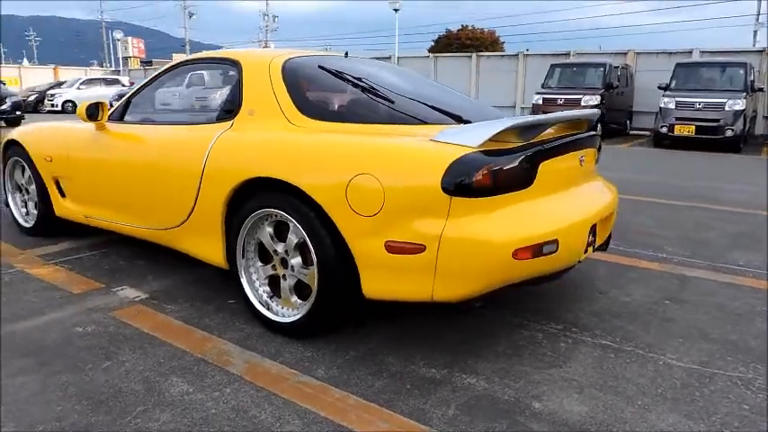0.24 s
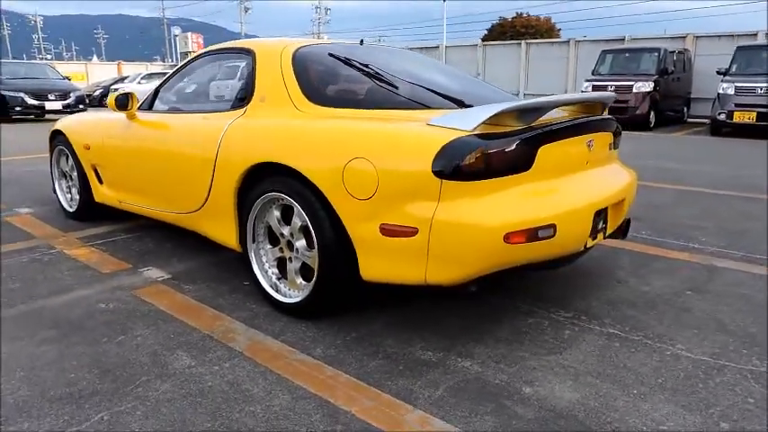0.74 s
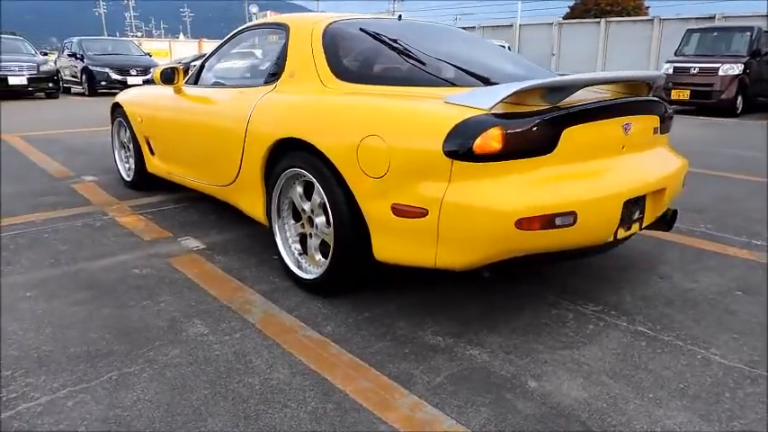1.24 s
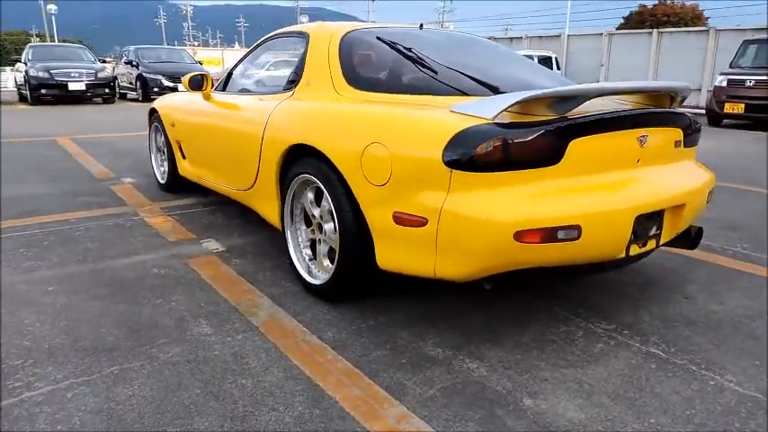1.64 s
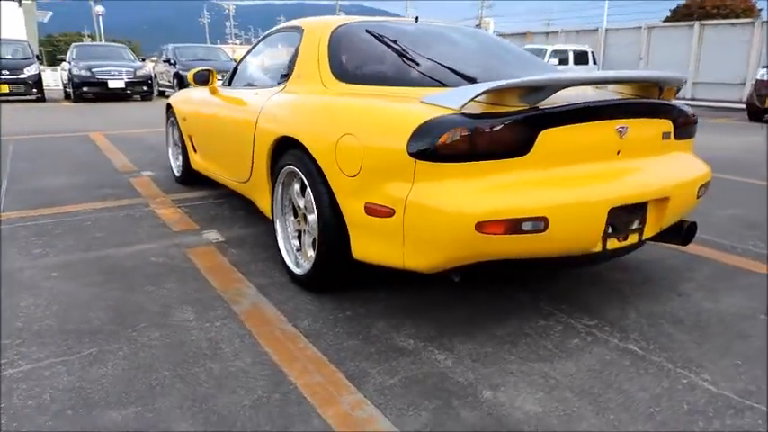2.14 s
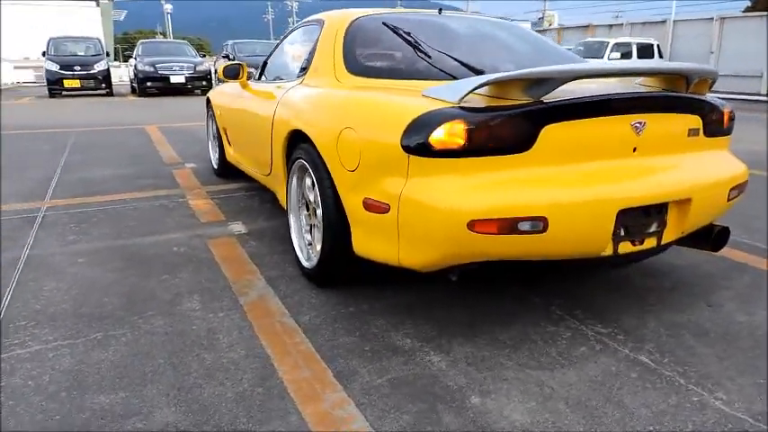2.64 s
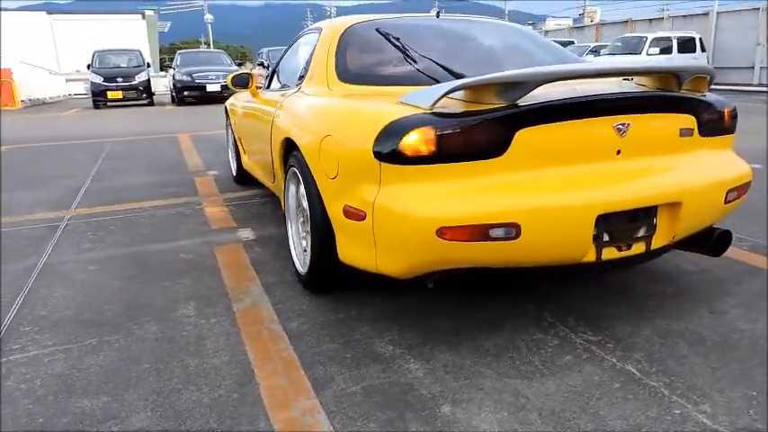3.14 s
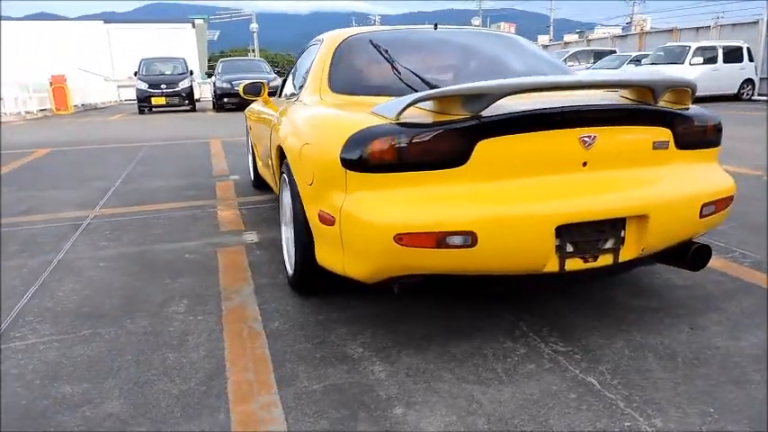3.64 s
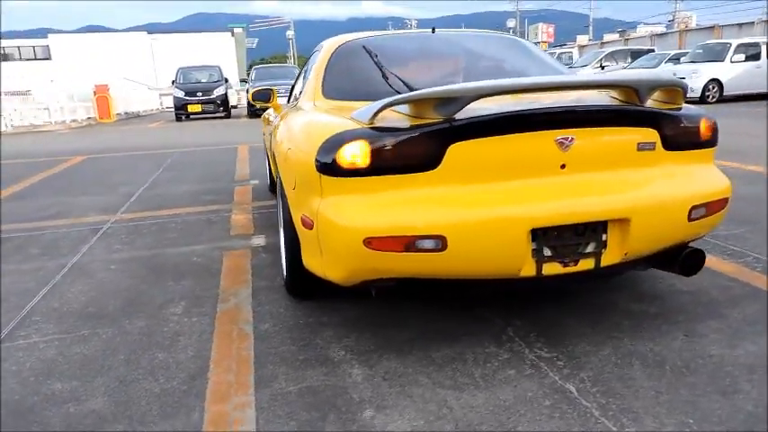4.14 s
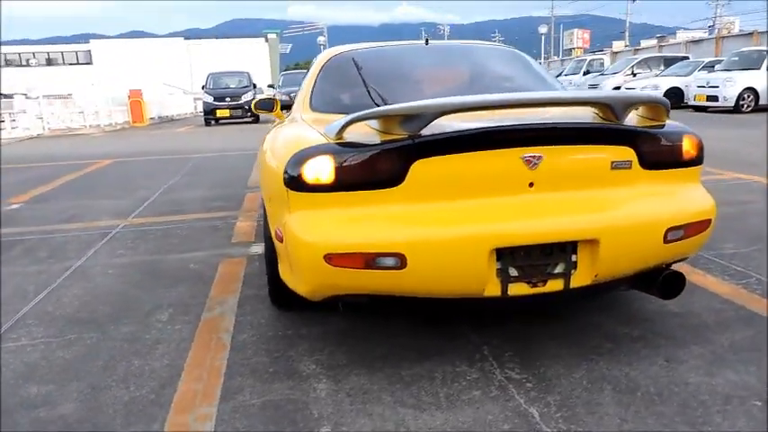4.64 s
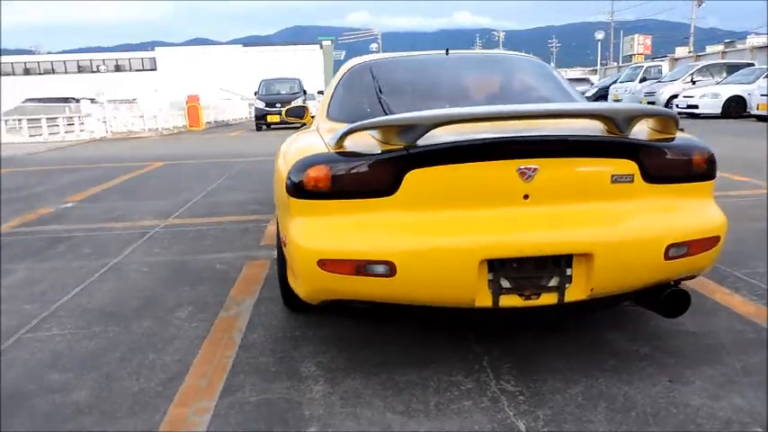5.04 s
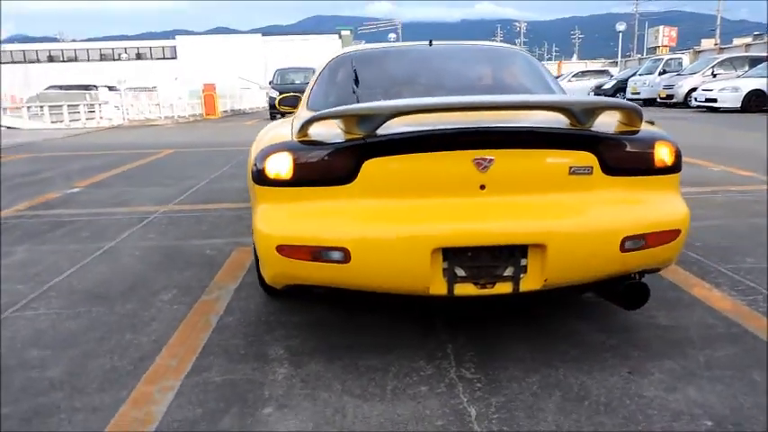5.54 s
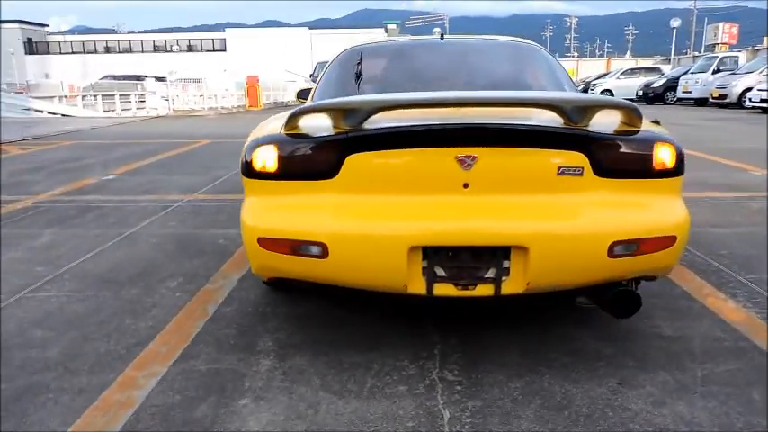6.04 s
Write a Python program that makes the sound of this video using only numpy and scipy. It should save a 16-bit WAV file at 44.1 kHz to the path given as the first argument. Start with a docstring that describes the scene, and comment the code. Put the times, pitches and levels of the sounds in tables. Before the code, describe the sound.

The deep, pulsing exhaust drone of an idling sports car swells and sinks, buffeted by dull bumps of wind.

```python
"""A car idles with a fast, low throb while gusts of wind thump on the microphone.
Its rotary engine fires about twenty times a second. Each push of gas rings the silencer and tail pipe
and comes with a puff of noise, a rattle and a hiss. The drone changes as the listener walks round to the
tail. Gusts hit the left and right sides separately; the scene sinks after strong ones and swells again.
Behind it all are a thin sizzle, one faint squeak, a few clicks and a soft breeze."""
import sys
import numpy as np
from scipy.fft import rfft, irfft, next_fast_len
from scipy.io import wavfile
from scipy.ndimage import uniform_filter1d, map_coordinates

SR = 44100
rng = np.random.default_rng(int(sys.argv[2]) if len(sys.argv) > 2 else 0)


def to_wav(sig):
    """Store sig (one row per channel, or 1-D mono) as 16-bit WAV at the path in sys.argv[1].

    Samples outside -1..1 are clipped; the rate is SR.
    """
    pcm = np.clip(np.atleast_2d(sig), -1, 1) * 32767
    pcm = np.round(pcm).astype(np.int16)
    wavfile.write(sys.argv[1], SR, pcm.T)  # frames by channels


N = 277808

# The scene's loudness, set to sink after strong gusts and recover: time_s, scene_db, boom_db
LOUDNESS = [(0.05, -65, -21), (0.33, -67, -22), (0.5, -68, -19), (0.53, -73.5, -29), (0.79, -78, -32.5),
            (1.05, -78, -33), (1.48, -71.5, -23.5), (1.85, -75, -29), (2.26, -68, -20.5),
            (2.45, -75.5, -28), (3.05, -74, -25), (3.52, -67.5, -19), (3.8, -69, -19.5), (3.97, -79, -29),
            (4.49, -80, -32), (4.9, -73, -21), (5.27, -80.5, -30.5), (5.82, -70.5, -18.5),
            (5.99, -78.5, -25.5), (6.25, -76.5, -26.5)]


def engine():
    """The idling car: all its sounds follow the same firings and are louder on the right."""
    # As the listener walks round the car, the left side hears it early or late: time_s, delay_samples
    left_delay = [(0, -2), (.6, -4), (2.7, -1), (4.7, 2), (6.3, 2)]
    scene_db, boom_db = curves(LOUDNESS)
    phase, firing, strength = firings()
    boom = exhaust_boom(firing, strength) * amp(boom_db + lean_right(2.5))
    roar = gas_roar(phase, firing, strength) * amp(scene_db + 37)
    drone = gas_drone(phase, firing, strength) * amp(scene_db + 22.5)
    tick_strength = rng.standard_normal(len(strength))
    accent = amp(1.8 * tick_strength[firing] + 2.5 * (-1) ** firing)  # every second firing is harder
    rattling = rattle(phase) * accent * amp(scene_db)
    spitting = spit(phase) * accent * amp(scene_db - 0.5)
    hiss = engine_hiss(phase, firing, tick_strength) * amp(scene_db + 8 + lean_right(1.2))
    left, right = boom + hiss + (roar + drone + rattling + spitting) * amp(lean_right(2.3))
    left = map_coordinates(left, [np.arange(N) - curves(left_delay)[0]], mode="nearest")
    return np.array([left, right])


def firings():
    """The beat: how far each cycle has got (0 to 1), which firing it is, and a random strength for each."""
    # The slightly uneven idle: time_s, firings_per_s
    idle_speed = [(0.0, 20.308), (0.45, 19.986), (0.9, 19.856), (1.35, 19.843), (1.8, 19.995),
                  (2.25, 19.966), (2.7, 20.222), (3.15, 19.963), (3.6, 19.658), (4.05, 19.856),
                  (4.5, 19.799), (4.95, 20.282), (5.4, 19.933), (5.85, 19.911), (6.3, 20.283)]
    cycles = np.cumsum(curves(idle_speed)[0]) / SR + .1
    firing = cycles.astype(int)
    return cycles % 1, firing, rng.standard_normal(firing[-1] + 1)


def exhaust_boom(firing, strength):
    """Each firing is one rounded push of gas that rings the silencer and the tail pipe."""
    # The silencer's notes, which swell after the push: pitch_hz, width_hz, level_db
    silencer_notes = [(37.9, 11, -6.5), (60.25, 6.9, 2), (79.7, 6.6, -4.5)]
    # The tail pipe's notes, which start at once: pitch_hz, width_hz, level_db
    pipe_notes = [(114.07, 11.6, -3.5), (132, 17, -18.5), (177.5, 18, -23.5), (243.5, 17, -15)]
    size = amp(1.3 * strength[firing] + 0.2 * (-1) ** firing)  # the two rotors differ a little
    pushes = np.diff(firing, prepend=0) * size
    ring = lambda f, hz, width, db: amp(db) * width / (hz * hz - f * f + 1j * f * width)
    silencer = lambda f: sum((note[0] + .3j * f) * ring(f, *note) for note in silencer_notes)
    pipe = lambda f: sum(1j * f * ring(f, *note) for note in pipe_notes)
    travel_s = .0038  # from the engine to the pipe's mouth
    round_push = lambda f: np.exp(-2j * np.pi * f * travel_s) / (1 + (f / 220) ** 3)
    return unit(filtered(pushes, lambda f: (silencer(f) + pipe(f)) * round_push(f)))


def gas_roar(phase, firing, strength):
    """Deep noise of gas and engine that puffs at each firing."""
    # The roar's tone: pitch_hz, level_db
    tone = [(30, 2), (100, 2.5), (200, -7), (400, -14), (620, -15.5), (800, -18.5), (1500, -24),
            (2000, -29.5), (2800, -37), (4100, -58.5), (6000, -64)]
    return unit(stereo_noise(tone) * puffs(phase, firing, strength, puff_db=0, rotor_db=-0.5, life=0.2))


def gas_drone(phase, firing, strength):
    """Gas noise hums in a few bands, whose balance shifts on the walk from the car's side to its tail."""
    # The humming bands: pitch_hz, width_hz, beside_car_db, behind_car_db
    hums = [(245, 26, 2, 0), (375, 90, -2, -12), (452, 45, 0, -5), (616.4, 20, -4, 7)]
    bands = lambda f: sum(amp(db)[:, None] / (1 + (2 * (f - hz) / width) ** 4) for hz, width, *db in hums)
    side, tail = filtered(rng.standard_normal(N), bands)
    behind = np.interp(np.arange(N) / SR, [2, 5], [0, 1])  # the walk lasts from 2 s to 5 s
    drone = side * (1 - behind) + tail * behind
    return unit(drone * puffs(phase, firing, strength, puff_db=6, rotor_db=1.2, life=.3))


def rattle(phase):
    """The engine bay rattles once a firing: narrow noise that blurs as the listener nears the tail."""
    # The rattle, fading from the first row's band to the last's: time_s, level_db, pitch_hz, width_hz
    bands = [(0, 18, 1650, 120), (2.2, 19, 1650, 120), (2.9, 17, 1550, 200), (6.3, 19, 1550, 350)]
    clear, blurred = (unit(filtered(rng.standard_normal(N), lambda f: 1 / (1 + ((f - hz) / width) ** 4)))
                      for _, _, hz, width in (bands[0], bands[-1]))
    level_db, _, width_hz = curves(bands)
    blur = (width_hz - bands[0][3]) / (bands[-1][3] - bands[0][3])
    burst = np.sin(np.pi * np.minimum(phase / .26, 1)) ** 2
    return (clear * np.sqrt(1 - blur) + blurred * np.sqrt(blur)) * burst * amp(level_db)


def spit(phase):
    """A very high, short tick of noise just after each firing."""
    noise = unit(filtered(rng.standard_normal((2, N)), lambda f: peak(f, 12500, 3200)))
    return (noise[0] + .5 * noise) * np.exp(-((phase - .07) / .09) ** 2)


def engine_hiss(phase, firing, strength):
    """The fine hiss of the engine bay, pulsing with the firings."""
    # The hiss's tone: pitch_hz, level_db
    tone = [(1500, -7), (3000, 4.5), (5000, -2), (8000, -6), (10300, -6), (12000, -6.5), (13700, -10.5),
            (15500, -7)]
    return unit(stereo_noise(tone) * puffs(phase, firing, strength, puff_db=1.5, rotor_db=2, life=.15))


def wind():
    """Each gust is a short, dull, lumpy burst of swirling air breaking on one side of the microphone."""
    # The strong gusts: middle_s, side (-1 left, 1 right), length_s, level_db, brightness_hz
    gusts = [(0.443, 1, 0.079, -25, 316), (.477, -1, 0.026, -17, 225), (.503, 1, 0.031, -15, 462),
             (0.611, 1, 0.023, -15.5, 507), (0.663, 1, 0.023, -28, 256), (0.695, -1, 0.018, -24.5, 354),
             (.708, 1, .024, -16.5, 248), (0.805, 1, 0.033, -21, 414), (1.307, 1, 0.03, -19, 328),
             (1.315, -1, 0.046, -24, 268), (1.372, -1, 0.031, -16.5, 189), (1.373, 1, 0.026, -21, 254),
             (1.474, -1, 0.016, -20, 355), (1.573, -1, .085, -30.5, 191), (1.683, -1, 0.0046, -13.5, 403),
             (2.316, -1, 0.019, -14, 401), (2.323, 1, 0.052, -13, 455), (2.381, 1, .07, -27, 253),
             (2.408, -1, 0.025, -21.5, 544), (2.494, 1, 0.036, -22.5, 332), (2.734, -1, 0.0067, -17, 329),
             (2.754, 1, 0.016, -26.5, 520), (2.787, 1, 0.1, -21.5, 295), (2.833, 1, 0.028, -20, 363),
             (3.882, -1, .031, -25.5, 528), (3.907, 1, 0.014, -6, 319), (3.958, 1, 0.056, -11.5, 491),
             (4.029, 1, 0.029, -16.5, 496), (4.052, 1, 0.017, -17.5, 527), (4.161, 1, 0.02, -30, 390),
             (4.202, -1, 0.02, -24.5, 516), (4.233, 1, 0.023, -18, 557), (4.27, -1, 0.022, -19.5, 332),
             (4.304, 1, 0.042, -29, 396), (4.339, 1, 0.013, -24, 527), (4.589, 1, 0.017, -28.5, 296),
             (4.857, -1, 0.11, -41, 254), (4.923, -1, 0.013, -29, 396.5), (4.931, 1, 0.011, -18.5, 279),
             (5.003, 1, .078, -23, 515), (5.073, -1, 0.019, -16.5, 338), (5.104, 1, 0.016, -26.5, 480),
             (5.147, -1, 0.093, -27, 460), (5.188, 1, 0.044, -25, 339), (5.199, -1, 0.051, -26.5, 435),
             (5.276, 1, 0.025, -22.5, 293), (5.82, -1, 0.0064, -23, 292), (5.867, -1, 0.022, -17.5, 285),
             (5.875, 1, 0.083, -20.5, 408), (5.904, -1, 0.031, -18.5, 533), (6.007, -1, 0.034, -21.5, 527),
             (6.275, 1, 0.048, -27.5, 358)]
    span = 8192  # samples set aside for one gust
    out, t = np.zeros((2, N + 2 * span)), (np.arange(span) - span // 2) / SR
    shaped = lambda noise, fade: unit(noise * fade) * np.sqrt(np.mean(fade ** 2))  # as strong as the fade
    for middle_s, side, length_s, db, bright_hz in gusts + faint_gusts(gusts):
        swirls = rng.standard_normal(span) * amp(6.3 * wobble(259.76, size=span))
        dull = lambda f: amp(-10 * (f / bright_hz) ** 1.093)
        flutter = filtered(swirls, lambda f: dull(f) * f ** 2 / (f ** 2 + 170 ** 2))
        bass = filtered(swirls, lambda f: f / (f + 25) / (1 + (f / 150) ** 4))
        # the bass swells over a longer time than the flutter
        quick = np.exp(-np.abs(2 * t / np.maximum(length_s, .008)) ** 1.62)
        slow = np.exp(-(2 * t / (length_s + 0.025)) ** 2)
        # the sharpest swirls crackle above the flutter
        snaps = rng.standard_normal(span) * amp(5.5 * wobble(401.7, size=span))
        crackle = filtered(snaps, lambda f: (f / 1900) ** 2 / (1 + (f / 1900) ** 7))
        burst = amp(db) * shaped(flutter, quick)
        burst += amp(db - 40.5) * (bright_hz / 400) ** 3 * shaped(crackle, quick)
        burst += amp(-24 + 0.32 * (db + 15.5)) * shaped(bass, slow)
        out[int(side > 0), round(middle_s * SR):][:span] += burst
    return out[:, span // 2:][:, :N]


def faint_gusts(gusts):
    """One weak, random gust near each strong one."""
    shift, side, length, level, bright = rng.standard_normal((len(gusts), 5)).T
    middle_s = np.clip(np.transpose(gusts)[0] + .06 * shift, 0, N / SR)
    length_s, bright_hz = 0.049 * np.exp(.5 * length), 300 * np.exp(0.34 * bright)
    return list(zip(middle_s, side, length_s, -32.5 + 2.5 * level, bright_hz))


def sizzle():
    """Thin, flickering noise near the top of hearing that comes in spells, with a trace between them."""
    # The spells of sizzle: start_s, end_s, level_db
    spells = [(0.174, 0.447, -1), (1.2, 1.28, -11), (1.87, 1.95, 0), (2.078, 2.28, -9), (2.64, 2.84, -14),
              (3.494, 3.805, -8.5), (5.218, 5.5, -8), (6.024, 6.15, -11)]
    rise_s, fall_s, trace_db = .04, .06, -16.5
    t = np.arange(N) / SR
    bands = lambda f: peak(f, 13600, 550) + .3 * peak(f, 10300, 900)
    middle, spread = unit(filtered(rng.standard_normal((2, N)), bands))
    noise = unit(middle + 0.35 * spread * [[1], [-1]])
    spell = lambda start, end: np.exp(-np.maximum(start - t, 0) / rise_s - np.maximum(t - end, 0) / fall_s)
    swell = amp(trace_db) + sum(amp(db) * spell(start, end) for start, end, db in spells)
    scene_db = curves(LOUDNESS)[0]
    return noise * swell * amp(scene_db + 3.5 + 2.4 * wobble(30) + lean_right(2))


def squeak():
    """One short, faint squeak: noise so narrow that it has a pitch."""
    middle_s, half_length_s, pitch_hz, level_db = 3.39, .12, 3266, -66.5
    thin = unit(filtered(rng.standard_normal(N), lambda f: peak(f, pitch_hz, 45)))
    return thin * amp(level_db) * np.exp(-((np.arange(N) / SR - middle_s) / half_length_s) ** 2)


def clicks():
    """Dry clicks: bursts of noise about a millisecond long."""
    # The single clicks: start_s, level_db, left_minus_right_db
    hits = [(3.955, -60, -15.5), (3.9739, -48, -8.5), (4.0198, -54.5, -9.5), (4.057, -52, -8.5),
            (4.2354, -52.5, -9.5), (4.9203, -47.5, -1), (5.2065, -53, -4), (5.8718, -40, -1.5)]
    out, t = np.zeros((2, N + SR)), np.arange(200) / SR
    for start_s, db, pan_db in hits:
        click = rng.standard_normal(len(t)) * amp(-60 * t / 0.0039)
        out[:, round(start_s * SR):][:, :len(t)] += amp(db + lean_right(-pan_db / 2)) * click
    return filtered(out[:, :N], lambda f: 1j * f / (1500 + 1j * f) / (1 + 1j * f / 4000))


def breeze():
    """A weak rumble of air, different on each side, that partly follows the scene's dips in loudness."""
    air = filtered(rng.standard_normal((2, N)), lambda f: f / (f + 30) * amp(-10 * f / 160))
    scene_db = curves(LOUDNESS)[0]
    lumps = amp(3.5 * np.array([wobble(6.6), wobble(23)]))
    return unit(air * lumps) * amp(-40.5 + 0.49 * (scene_db - scene_db.mean()))


def puffs(phase, firing, strength, puff_db, rotor_db, life):
    """A gain that jumps at each firing and falls back; life is the fading time as a share of the cycle."""
    size = amp(puff_db + rotor_db * (-1) ** firing + 0.54 * strength[firing])
    gain = np.sqrt(1 + size ** 2 * np.exp(-phase / life))
    return uniform_filter1d(gain, size=90)


def stereo_noise(tone):
    """Noise of a given tone, with left and right alike in the bass and mostly unrelated in the treble."""
    # How alike the two sides are: pitch_hz, likeness (1 is identical)
    likeness = [(100, 0.93), (520, 1), (900, 0.72), (1500, 0.53), (2600, 0.21), (4000, 0.15)]
    angle = lambda hz: np.arccos(np.clip(at_pitch(likeness, hz), -1, 1)) / 2
    shape = lambda hz: amp(at_pitch(tone, hz)) * [np.cos(angle(hz)), np.sin(angle(hz))]
    middle, spread = filtered(rng.standard_normal((2, N)), shape)
    return unit(np.array([middle + spread, middle - spread]))


def amp(db):
    """Turn decibels into a gain."""
    return 10 ** (np.asarray(db) / 20)


def lean_right(db):
    """Lower the left side and raise the right by db each."""
    return np.array([[-db], [db]])


def unit(x):
    """Scale a sound to an average (rms) level of 1."""
    return x / np.sqrt(np.mean(x ** 2) + 1e-20)


def peak(f, pitch_hz, half_width_hz):
    """A filter shape with one hump."""
    return 1 / (1 + ((f - pitch_hz) / half_width_hz) ** 2)


def at_pitch(points, hz):
    """Read between (pitch_hz, value) points on a log scale."""
    pitches, values = np.transpose(points)
    return np.interp(np.log(hz + 1), np.log(pitches + 1), values)


def curves(rows):
    """Turn each column after time_s into one value per sample."""
    times, *columns = np.transpose(rows)
    return [np.interp(np.arange(N) / SR, times, column) for column in columns]


def wobble(rate, size=N):
    """A smooth random curve through `rate` points a second."""
    points = rng.standard_normal(size // 40 + 4)
    return map_coordinates(points, [np.arange(size) * rate / SR])


def filtered(x, response):
    """Multiply each frequency in x by response(hz)."""
    size = next_fast_len(x.shape[-1] + SR // 2)
    return irfft(rfft(x, size) * response(np.fft.rfftfreq(size, 1 / SR)), size)[..., :x.shape[-1]]


def scene():
    """The car, the small noises and the wind together, in stereo."""
    return engine() + sizzle() + squeak() + clicks() + wind() + breeze()


def record(dry):
    """Gently squeeze the peaks, then cut the deepest bass and the highest treble."""
    ceiling, bottom_hz, top_hz = .95, 8, 15760
    squeezed = dry / (1 + np.abs(dry / ceiling) ** 6) ** (1 / 6)
    return filtered(squeezed, lambda hz: 1j * hz / (bottom_hz + 1j * hz) * (hz < top_hz))


dry = scene()
out = record(dry)
to_wav(out)
```